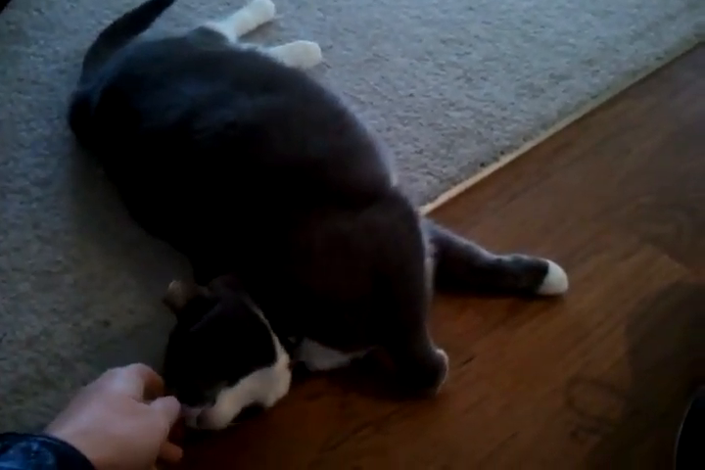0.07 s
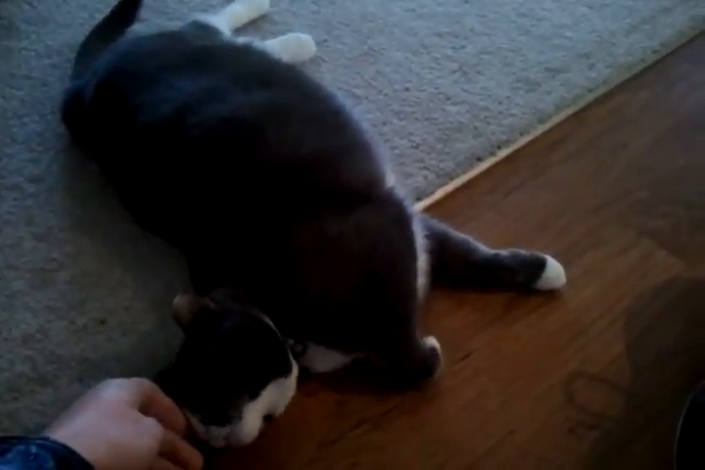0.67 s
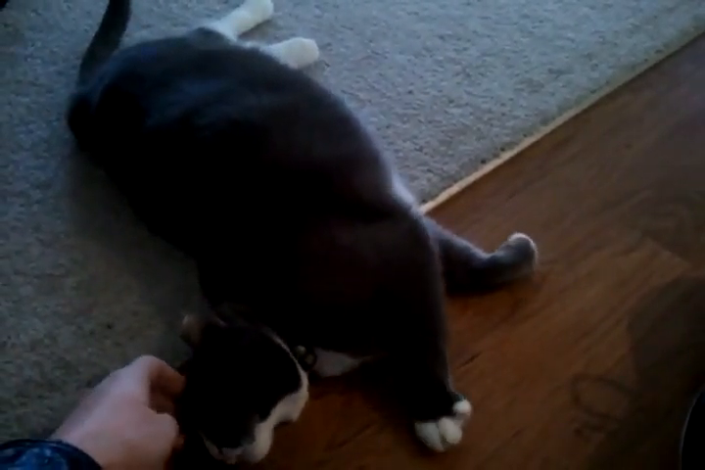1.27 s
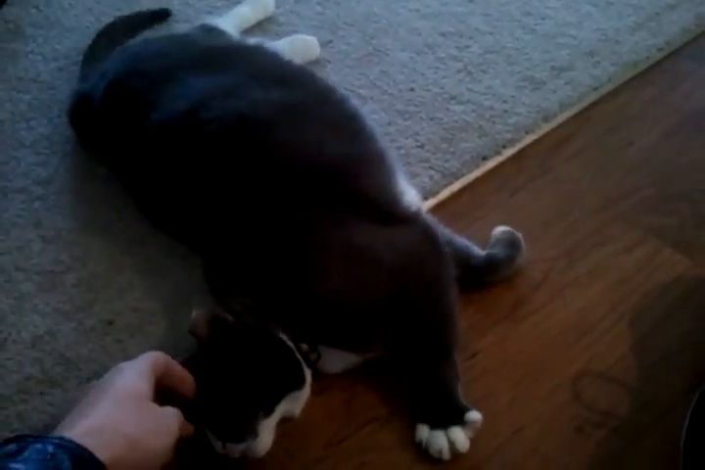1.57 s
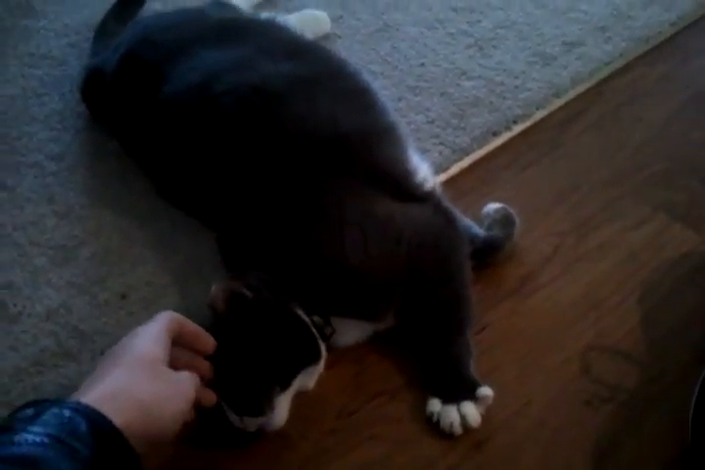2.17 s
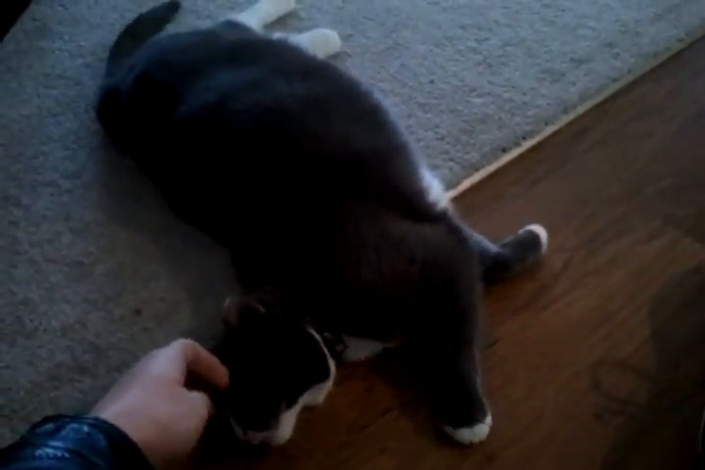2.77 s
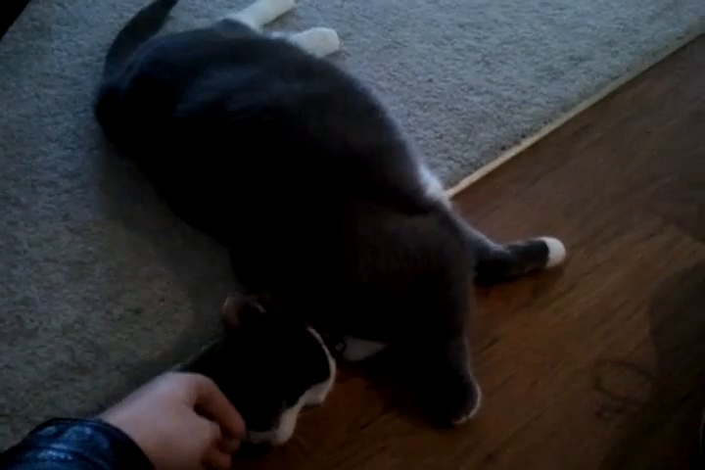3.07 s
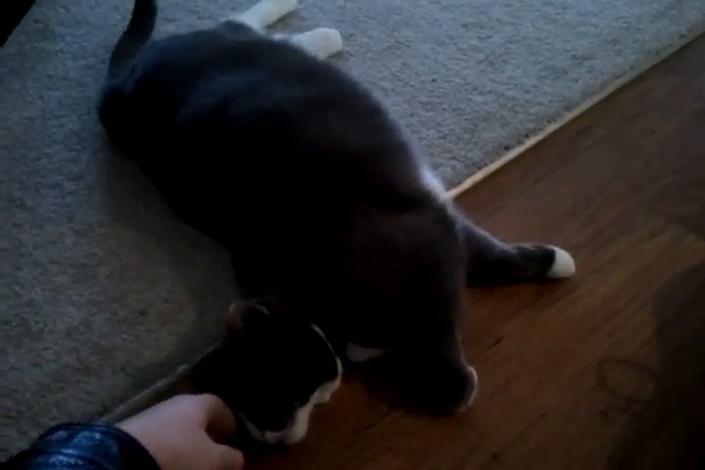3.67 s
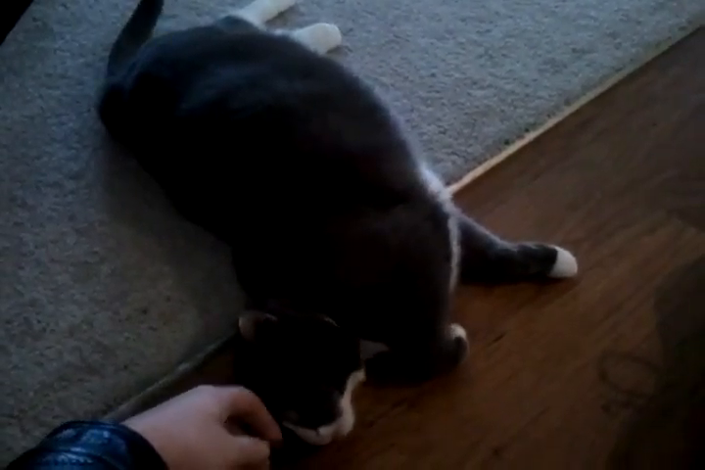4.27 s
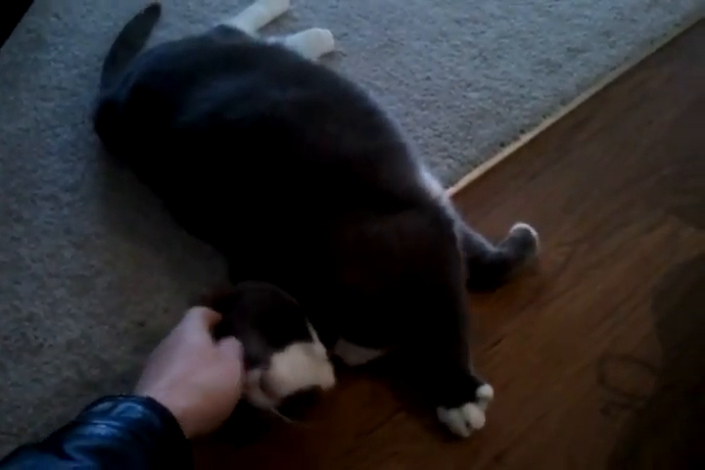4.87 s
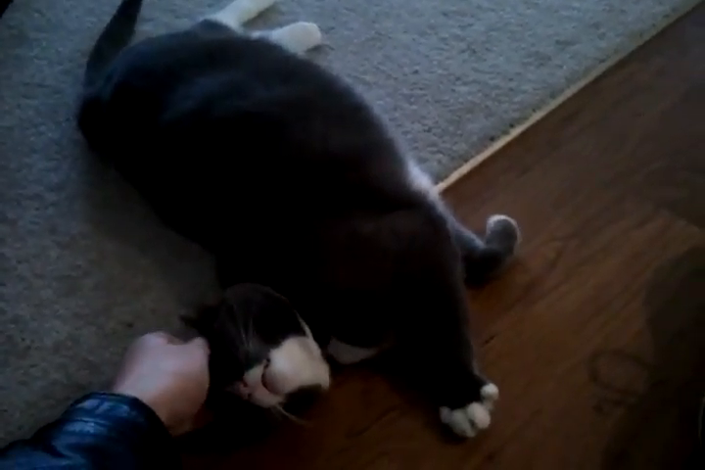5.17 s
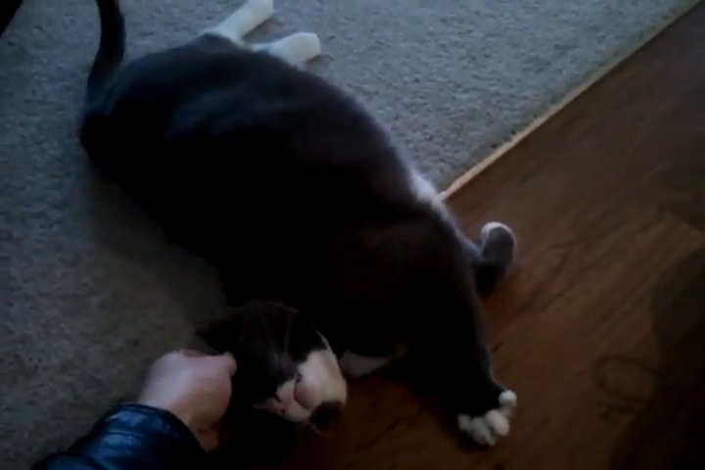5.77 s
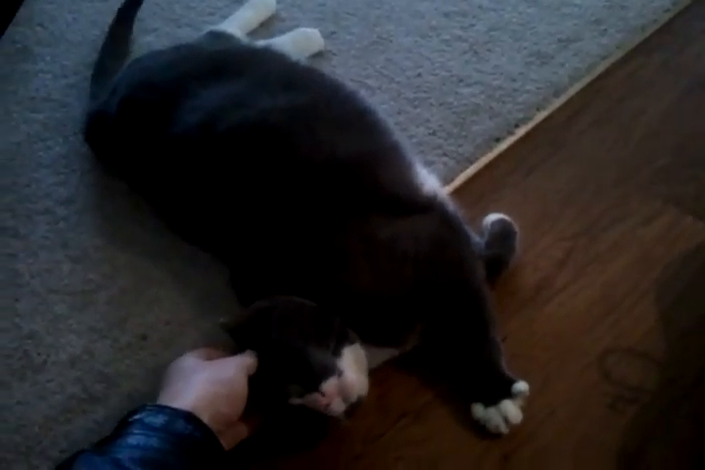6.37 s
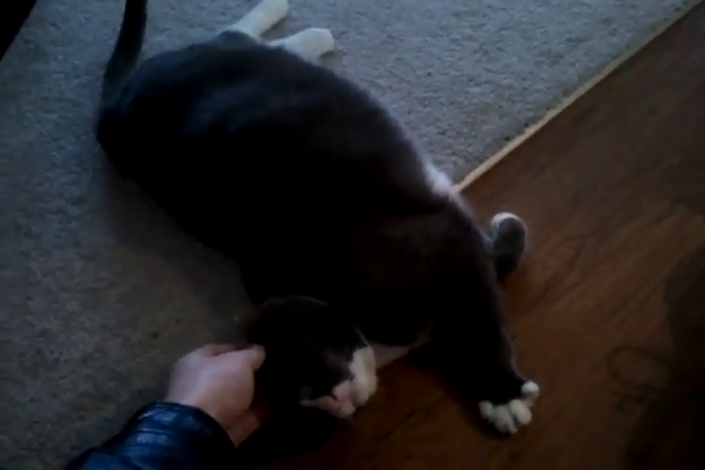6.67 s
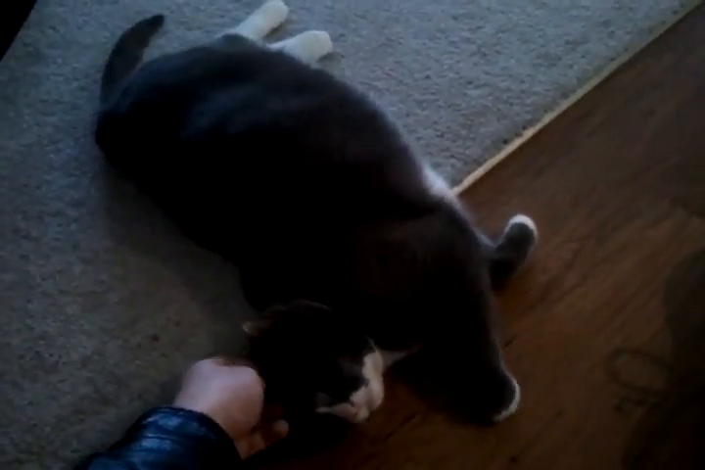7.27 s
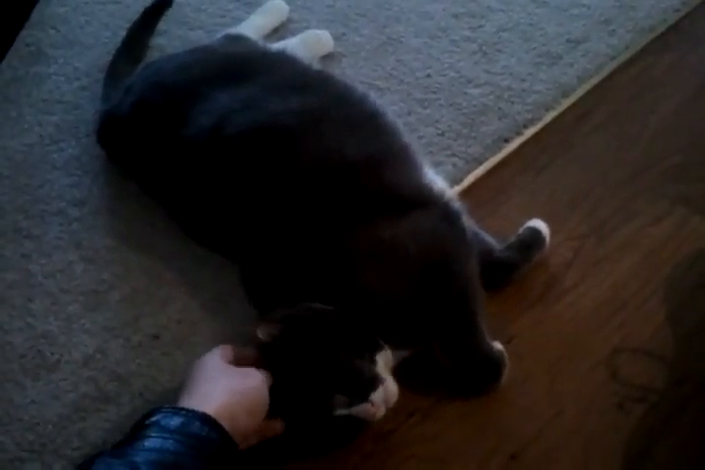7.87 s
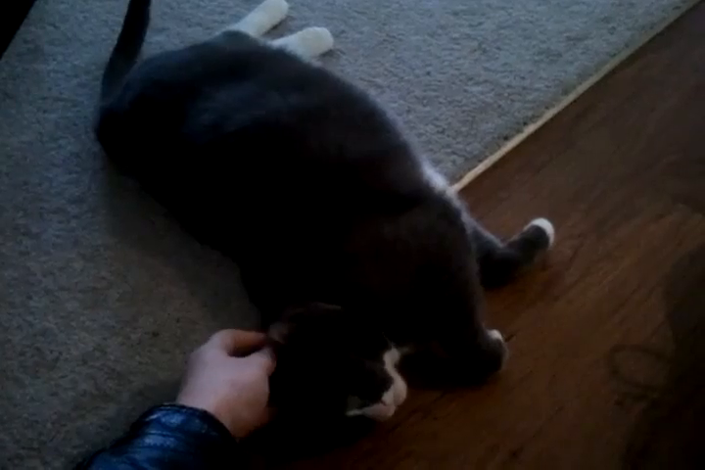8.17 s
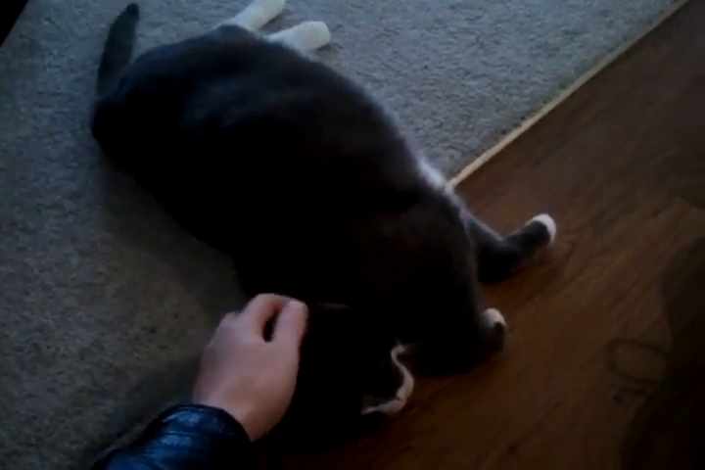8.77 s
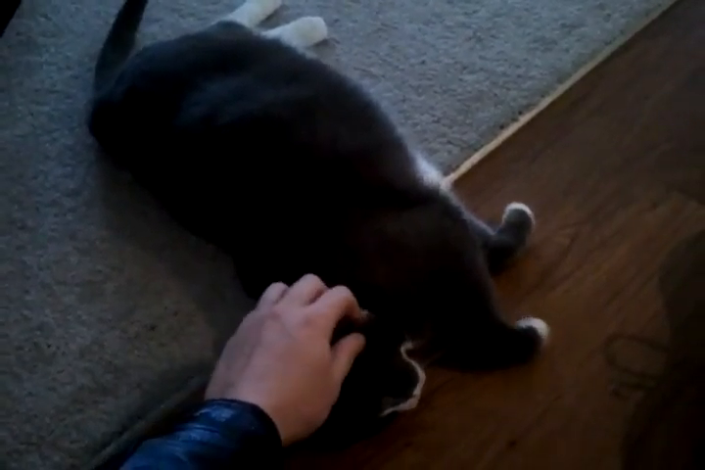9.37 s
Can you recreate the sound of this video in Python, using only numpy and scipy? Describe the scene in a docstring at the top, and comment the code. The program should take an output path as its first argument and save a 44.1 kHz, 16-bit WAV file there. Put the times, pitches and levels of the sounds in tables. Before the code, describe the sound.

A hand rubs a cat's head in a quiet room. A brief rustle and one dry snap come early, then only sparse ticks. Midway the fur rustling grows, with quick scratches, clicks and dull taps, followed by a faint thin squeak and two soft knocks. Lighter rubbing continues to the end. A low household hum and the hiss of a small nearby microphone run underneath.

```python
"""A hand rubs the head of a cat lying on the edge of a carpet and a wooden floor, in a quiet room.
Skin rubs the coat and hairs flick free in a rustle; slipping fingertips and nails jolt the head
and give dull taps, scratches, clicks and ticks. Two firmer knocks, one dry snap and one thin
squeak pass. Household machines hum; a small narrow-band recorder adds hiss."""
import sys
import numpy as np
from scipy import signal
from scipy.fft import rfft, irfft
from scipy.io import wavfile
from scipy.ndimage import uniform_filter1d

SR = 44100
rng = np.random.default_rng(int(sys.argv[2]) if len(sys.argv) > 2 else 0)


def master_out(mix):
    """Clip the mix to full scale and print it as 16-bit PCM to the path in sys.argv[1]."""
    frames = np.transpose(np.atleast_2d(mix))
    ceiling = np.clip(frames, -1, 1)
    pcm = np.round(ceiling * 32767).astype(np.int16)
    wavfile.write(sys.argv[1], SR, pcm)


N = 424241
TIME_S = np.arange(N) / SR
FREQ_HZ = np.arange(N // 2 + 1) * SR / N
RING_TIME_S = np.arange(SR // 10) / SR

# Noise floors. Each row: frequency in Hz, density in dB per Hz.
ROOM_SPECTRUM = [(8, -60), (20, -58.5), (34, -56.5), (50, -59.5), (90, -63.5), (150, -67.5), (250, -68),
                 (360, -72.5), (600, -79), (1000, -82), (2500, -94.5), (7000, -110)]
HISS_SPECTRUM = [(100, -84.5), (1500, -83.5), (2600, -85), (4700, -86), (6200, -86)]
# Recorder treble roll-off. Each row: frequency in Hz, gain in dB.
RECORDER_RESPONSE = [(6300, 0), (6750, -3.5), (7100, -6), (7500, -21)]
# Drone of household machines. Each row: centre in Hz, width in Hz, level in dB.
DRONE_BANDS = [(35.33, 4.4, -47.5), (60.13, 1.1, -53.5), (115.6, 4.2, -52.5), (176.5, 8.4, -60),
               (235.6, 14, -58.5), (255.4, 5.3, -54.5), (303, 27, -61)]
# Motor hum. Each row: time in seconds, level in dB.
MOTOR_LEVELS = [(0, -52.5), (3.8, -54), (4.7, -49.5), (6.4, -52), (6.9, -45.5), (9.6, -46.5)]
# Squeak contour. Each row: time in seconds, pitch in Hz, level in dB.
SQUEAK_CONTOUR = [(6.446, 3100, -62), (6.455, 3040, -50), (6.472, 2900, -49.5), (6.492, 2980, -52),
                  (6.506, 3250, -59), (6.517, 3500, -48.5), (6.528, 3520, -64)]
# Resonances of slips and snap. Each row: frequency in Hz, width in Hz, relative gain in dB.
TAP_MODES = [(490, 48, -4.5), (533, 70, 4.5), (676, 80, -8), (800, 150, -9.5)]
SCRATCH_MODES = [(880, 130, -4.5), (1030, 180, 3), (1400, 440, -2.5), (1770, 340, -0.5)]
CLICK_MODES = [(2920, 730, 0), (3800, 720, -1)]
TICK_MODES = [(5200, 1400, -2), (6070, 930, 0), (7060, 1100, -1.7)]
SNAP_MODES = [(5980, 1960, 0)]
SNAP_BODY_MODES = [(2900, 2400, 0)]
# Deadened knocks. Each row: start in seconds, level in dB, pitch in Hz, hard edge over body in dB.
KNOCKS = [(6.5617, -31, 555, -12), (6.801, -36, 530, -9)]
# Slips. Each row: start in seconds, base level in dB, extra thud in dB, pitch ratio.
FINGERTIP_TAPS = [(2.484, -41.5, 2, 0.86), (5.388, -43, -1, 1.4), (5.391, -43.5, 2, 1.1),
                  (5.681, -42, 2, 1.1), (5.695, -35, 1, 0.96), (5.794, -37, -3.5, 0.95),
                  (5.887, -33.5, -0.5, 1.03), (5.9395, -38.5, 2, .85), (5.9445, -38.5, -3, 1.13),
                  (5.968, -41.5, 0, 1), (6.006, -32, -3, 1.07), (6.035, -44, -2, 1.4),
                  (6.1375, -40, 1, 0.9)]
COAT_SCRATCHES = [(.108, -42.5, 1, 0.99), (1.943, -40, -1, .8), (2.2315, -46, -8, 0.96),
                  (2.235, -38.5, -2.5, .9), (4.457, -42, -9, 0.83), (4.7363, -35.5, -2.5, 0.92),
                  (4.777, -37.5, -3, 0.94), (4.812, -36, -6, 0.95), (4.853, -36, -5, 0.88),
                  (4.859, -42, -6, 1), (4.9055, -34.5, -3, 1.03), (4.989, -35.5, 4, 0.99),
                  (5.1548, -37, 6.5, 0.95), (5.16, -42, 4, 0.92), (5.2115, -37.5, 5, 0.95),
                  (5.2958, -40, -7, 0.91), (5.3462, -39.5, 0, 1), (5.5715, -42, 0.5, 1.1),
                  (5.609, -46, -5, 1.1), (5.671, -50, -5, 1.3), (5.6955, -45, -6, 0.83),
                  (5.953, -45, 1, 1.07), (6.107, -42, 2, 0.69), (7.216, -46.5, -4, 1.2),
                  (8.689, -41.5, 0, 1.06), (8.9664, -41, -0.5, 0.96), (9.136, -47, 0, 0.58),
                  (9.425, -38.5, 2, 0.89)]
NAIL_CLICKS = [(4.712, -42, -3, .72), (5.0197, -39, -2, 0.95), (5.1296, -39.5, -5, 1.05),
               (5.635, -46, 3, .9), (5.695, -45, -1, 1.06), (5.772, -47, 3, 1), (5.795, -47, -6, 0.52),
               (7.562, -43.5, -2, .76), (8.9662, -47, -3, 0.64)]
TUFT_TICKS = [(2.442, -43, 3.5, 0.94), (4.677, -42.5, -1, 0.99), (4.7256, -45, -1, 1),
              (4.736, -43, -11, 1.04), (4.853, -48, -6, 0.95), (4.989, -52, -3, 1), (5.076, -43, 0, 1.2),
              (5.8875, -47.5, -4, 0.96), (6.122, -42, -12, 1), (7.214, -44.5, -3, 1.12),
              (7.547, -44, 5, .98), (7.7013, -42, 6, 1.02), (9.167, -39, -1.5, 1)]
# Fur spectra. Each row: frequency in Hz, relative gain in dB.
RUB_SPECTRUM = [(150, -18), (270, -1), (380, -4), (470, -5), (550, 0.5), (640, -5.5), (800, -4),
                (1200, -15.5), (1900, -14.5), (3000, -30.5)]
HAIR_SPECTRUM = [(900, -20), (1900, -4.5), (3500, 1.5), (5000, -2.5), (6300, -1.5), (7500, -0.5)]
CRACKLE_SPECTRUM = [(250, -21), (480, -0.5), (950, -2), (1800, -6.5), (2600, -11.5), (3500, -16),
                    (7000, -14.5)]
# Hand strokes. Each row: start in seconds, length in seconds, rub level in dB,
# hair over rub in dB, crackle over rub in dB.
STROKES = [(0, 0.078, -48, 2.5, -8), (2.198, 0.54, -56.5, -2, -6.5), (4.222, .2, -57.5, 3, -12),
           (4.648, 0.61, -46, 2, -5.5), (5.555, 0.55, -46, 0.5, -7), (6.346, 0.21, -45.5, -2.5, -2.5),
           (6.746, 0.072, -51, 0.5, -2), (7.33, 0.52, -54.5, -2.5, -5), (8.622, 0.88, -51, -1, -8)]

# Offsets per kind of slip for the tap, scratch, click and tick modes.
TAP_MIX_DB, SCRATCH_MIX_DB = (0.5, -16, -10.5, -13), (-4, -2.5, -11.5, -11.5)
CLICK_MIX_DB, TICK_MIX_DB = (0, -10.5, -2.5, -13), (0, -8, -7.5, 0.5)


def undb(db):
    """Decibels to gain."""
    return 10 ** (np.asarray(db) / 20)


def unit(x):
    """Scale to an rms of 1."""
    return x / np.sqrt(np.mean(x ** 2))


def colour(x, spectrum):
    """Filter by (Hz, dB) points joined on a log-frequency axis."""
    hz, db = np.transpose(spectrum)
    gain = undb(np.interp(np.log(FREQ_HZ + 1), np.log(hz), db))
    return irfft(rfft(x) * gain, N)


def noise(spectrum):
    """Noise with the given power per Hz."""
    return colour(rng.standard_normal(N), spectrum) * np.sqrt(SR / 2)


def curves(table):
    """Table columns interpolated linearly in time."""
    times_s, *columns = np.transpose(table)
    return [np.interp(TIME_S, times_s, column) for column in columns]


def wander(rate_hz):
    """Smooth random drift, rms 1."""
    hold = int(SR / rate_hz)
    steps = np.repeat(rng.standard_normal(N // hold + 1), hold)[:N]
    return unit(uniform_filter1d(steps, hold))


def add(out, start_s, sound, db):
    """Mix in a short sound; db is its level with the energy spread over 10 ms."""
    start = int(start_s * SR)
    sound = sound * undb(db) / np.sqrt(np.sum(sound ** 2) / (SR / 100))
    out[start:start + len(sound)] += sound[:N - start]


def release(scrape, decay_s):
    """A contact lets go: a unit jolt plus a fading scrape of the given strength."""
    push = rng.standard_normal(len(RING_TIME_S)) * np.exp(-RING_TIME_S / decay_s)
    push *= scrape / np.sqrt(np.sum(push ** 2))
    push[0] += 1
    return push


def contact(push, low_hz, high_hz):
    """A contact's softness cuts treble; its shortness cuts bass."""
    return signal.sosfilt(signal.butter(2, [low_hz, high_hz], "bandpass", fs=SR, output="sos"), push)


def ring(push, modes, pitch_ratio=1):
    """Damped modes driven by a push; wide modes die fast."""
    t = RING_TIME_S
    response = sum(undb(db) * np.exp(-np.pi * width_hz * t) * np.cos(2 * np.pi * hz * pitch_ratio * t)
                   for hz, width_hz, db in modes)
    return signal.fftconvolve(push, response)[:len(t)]


def room_drone(waver_db=0.56):
    """Low room rumble plus narrow noise bands from household machines."""
    out = noise(ROOM_SPECTRUM) * undb(waver_db * wander(rate_hz=5))
    for hz, width_hz, db in DRONE_BANDS:
        response = 1 / (1 + (2 * (FREQ_HZ - hz) / width_hz) ** 4)
        band = irfft(rfft(rng.standard_normal(N)) * response, N)
        out += undb(db) * unit(band)
    return out


def motor(hz=120.0, waver_db=1.85, pitch_spread=0.006):
    """A motor hum wavers in pitch and level, louder towards the end."""
    db = curves(MOTOR_LEVELS)[0] + waver_db * wander(rate_hz=4.9)
    phase = 2 * np.pi * np.cumsum(hz * (1 + pitch_spread * wander(rate_hz=9))) / SR
    return unit(np.sin(phase)) * undb(db)


def reverb(x, t60_s, wet_db, delay_s=0.003):
    """The carpeted room adds a short, weak tail."""
    t = np.arange(SR // 2) / SR
    tail = rng.standard_normal(len(t)) * np.exp(-np.log(1000) * t / t60_s) * (t > delay_s)
    tail /= np.sqrt(np.sum(tail ** 2))
    return x + undb(wet_db) * signal.fftconvolve(x, tail)[:N]


def squeak(flutter_db=2, pitch_spread=0.016):
    """A faint, rough whistle dips and rises in pitch."""
    hz, db = curves(SQUEAK_CONTOUR)
    phase = 2 * np.pi * np.cumsum(hz * (1 + pitch_spread * wander(rate_hz=700))) / SR
    flutter = unit(undb(flutter_db * wander(rate_hz=200)))
    gate = (TIME_S > SQUEAK_CONTOUR[0][0]) & (TIME_S < SQUEAK_CONTOUR[-1][0])
    return np.sqrt(2) * np.sin(phase) * undb(db) * flutter * gate


def snap(start_s=0.8644, crack_db=-26.5, body_db=-45.5):
    """One dry crack, like a static spark from the fur, over a faint lower body."""
    out = np.zeros(N)
    crack = ring(release(scrape=0.16, decay_s=0.0015), SNAP_MODES)
    add(out, start_s, ring(crack, SNAP_MODES), crack_db)  # second pass: a brief swell
    body = ring(release(scrape=0.2, decay_s=0.001), SNAP_BODY_MODES)
    add(out, start_s, body, body_db)
    return out


def knocks(width_hz=190, scratch_offset_db=-6.5, tick_offset_db=-6):
    """A soft push drives one damped mode, with a brief scratch and a hard edge on contact."""
    out = np.zeros(N)
    for start_s, db, hz, edge_db in KNOCKS:
        push = contact(release(scrape=0.38, decay_s=0.006), low_hz=380, high_hz=1100)
        sharp = release(scrape=1.0, decay_s=0.0038)
        scratch = contact(sharp, low_hz=650, high_hz=3200)
        add(out, start_s, ring(push, [(hz, width_hz, 0)]), db)
        add(out, start_s, ring(scratch, SCRATCH_MODES), db + scratch_offset_db)
        add(out, start_s, ring(sharp, CLICK_MODES, pitch_ratio=0.88), db + edge_db)
        add(out, start_s, ring(sharp, TICK_MODES), db + edge_db + tick_offset_db)
    return out


def slips(table, mix_db):
    """Slips jolt the soft head and ear; nail and hairs scrape on. The spot touched sets the pitch."""
    out = np.zeros(N)
    tap_db, scratch_db, click_db, tick_db = mix_db
    for start_s, db, thud_db, pitch_ratio in table:
        pad = contact(release(scrape=0.38, decay_s=0.0048), low_hz=296, high_hz=2540)
        sharp = release(scrape=0.57, decay_s=0.003)
        fingertip = contact(release(scrape=0.76, decay_s=0.0033), low_hz=624, high_hz=2630)
        add(out, start_s, ring(pad, TAP_MODES, pitch_ratio), db + tap_db + thud_db)
        add(out, start_s, ring(fingertip, SCRATCH_MODES, pitch_ratio), db + scratch_db)
        add(out, start_s, ring(sharp, CLICK_MODES, pitch_ratio), db + click_db)
        add(out, start_s, ring(sharp, TICK_MODES, pitch_ratio), db + tick_db)
    return out


def faint_slip_rows(rub_gain, per_s=10, offset_db=-5, scatter_db=3.5, scatter_octaves=0.15):
    """Table of small slips at random times; their level follows the rub."""
    draws = rng.random((int(per_s * N / SR), 4))
    starts = (draws[:, 0] * N).astype(int)
    level, thud, pitch = 2 * draws[:, 1:].T - 1
    db = 20 * np.log10(rub_gain[starts]) + offset_db + scatter_db * level
    return np.column_stack([starts / SR, db, scatter_db * thud, 2 ** (scatter_octaves * pitch)])


def hand_strokes(attack_s=0.056, release_s=0.17, idle_rub_db=-62.5, idle_hair_db=-57):
    """Rub, hair and crackle gains: each stroke presses in, holds and eases off over idling fingers."""
    rub_power, hair_power, crackle_power = undb(idle_rub_db) ** 2, undb(idle_hair_db) ** 2, 0
    for start_s, length_s, db, hair_db, crackle_db in STROKES:
        rise = np.clip((TIME_S - start_s) / attack_s, 0, 1)
        fall = np.exp(-np.maximum(TIME_S - start_s - length_s, 0) / release_s)
        gain = rise * fall * undb(db)
        rub_power += gain ** 2
        hair_power += (gain * undb(hair_db)) ** 2
        crackle_power += (gain * undb(crackle_db)) ** 2
    return np.sqrt(rub_power), np.sqrt(hair_power), np.sqrt(crackle_power)


def hair_flicks(per_s, spread_db):
    """Hairs flick free at random, a few harder than the rest."""
    hits = rng.random(N) < per_s / SR
    return hits * rng.standard_normal(N) * undb(spread_db * np.minimum(rng.exponential(size=N), 4))


def fur(rub_gain, hair_gain, crackle_gain, grip_spread_db=0.87, crackles_per_s=150):
    """Skin rubs the coat, hairs rustle and single ones crackle, all under an uneven grip."""
    grip = unit(undb(grip_spread_db * wander(rate_hz=35)))
    rub = unit(colour(hair_flicks(per_s=2200, spread_db=2.0), RUB_SPECTRUM))
    hair = unit(colour(hair_flicks(per_s=4000, spread_db=1.5), HAIR_SPECTRUM))
    impulses = (rng.random(N) < crackles_per_s / SR) * rng.uniform(0.39, 1, N)
    crackle = unit(colour(impulses, CRACKLE_SPECTRUM))
    return grip * (rub * rub_gain + hair * hair_gain + crackle * crackle_gain)


def scene():
    """Hand and cat in the humming room, mono."""
    background = room_drone() + motor()
    rub_gain, hair_gain, crackle_gain = hand_strokes()
    petting = fur(rub_gain, hair_gain, crackle_gain) + snap() + knocks() + squeak()
    faint_slips = faint_slip_rows(rub_gain)
    petting += slips(FINGERTIP_TAPS, TAP_MIX_DB) + slips(COAT_SCRATCHES, SCRATCH_MIX_DB)
    petting += slips(NAIL_CLICKS, CLICK_MIX_DB) + slips(TUFT_TICKS, TICK_MIX_DB)
    petting += slips(faint_slips, TAP_MIX_DB)
    return (reverb(petting, t60_s=0.2, wet_db=-20.0) + background)[None]


def record(dry):
    """The recorder adds hiss, cuts the treble and sits on a silent DC offset."""
    cutoff_hz, dc_offset = 7600, -0.6756
    sound = colour(dry[0] + noise(HISS_SPECTRUM), RECORDER_RESPONSE)
    lowpass = signal.ellip(10, 0.1, 70, cutoff_hz, fs=SR, output="sos")
    return signal.sosfilt(lowpass, sound)[None] + dc_offset


dry = scene()
out = record(dry)
master_out(out)
```